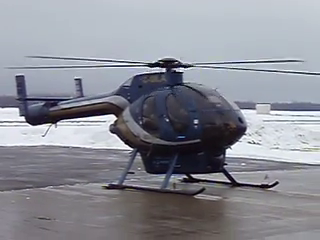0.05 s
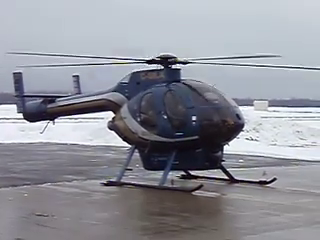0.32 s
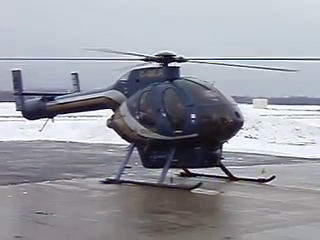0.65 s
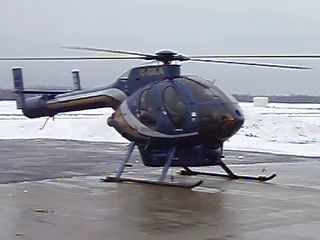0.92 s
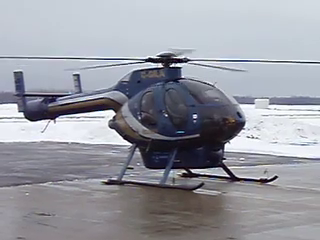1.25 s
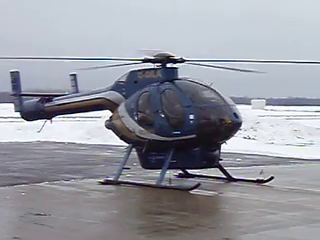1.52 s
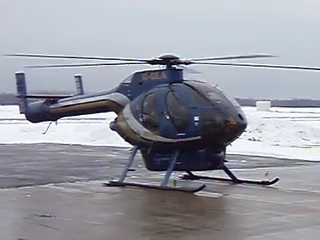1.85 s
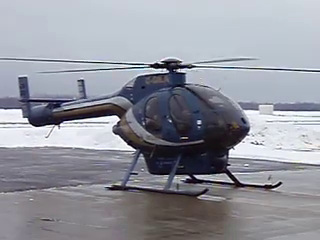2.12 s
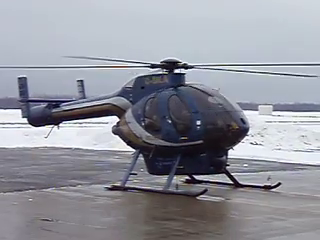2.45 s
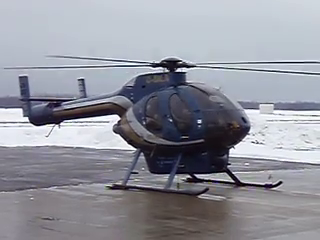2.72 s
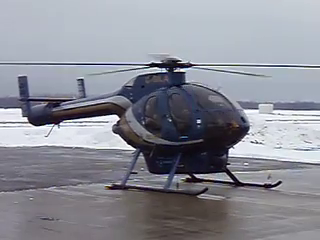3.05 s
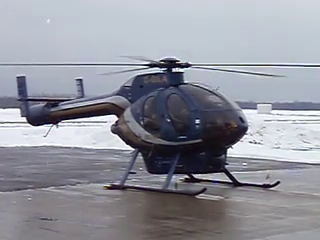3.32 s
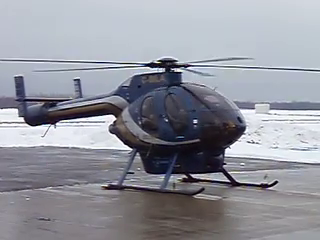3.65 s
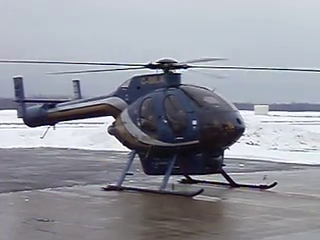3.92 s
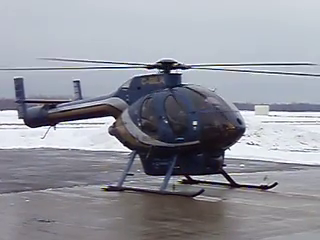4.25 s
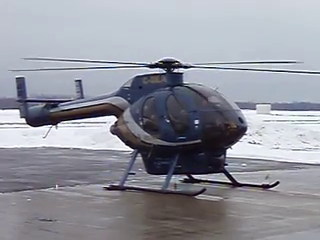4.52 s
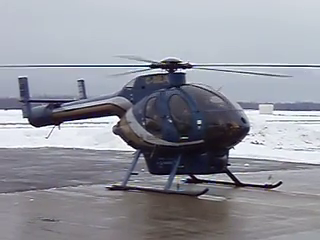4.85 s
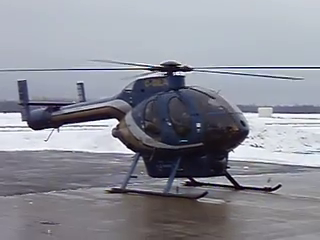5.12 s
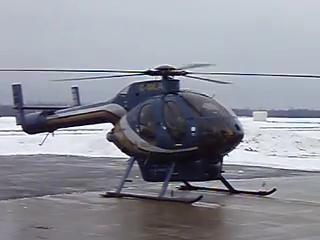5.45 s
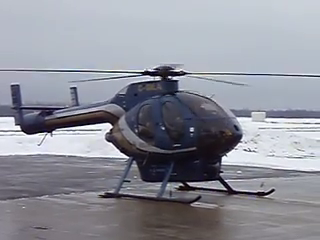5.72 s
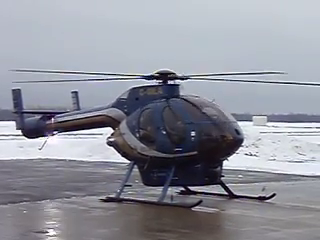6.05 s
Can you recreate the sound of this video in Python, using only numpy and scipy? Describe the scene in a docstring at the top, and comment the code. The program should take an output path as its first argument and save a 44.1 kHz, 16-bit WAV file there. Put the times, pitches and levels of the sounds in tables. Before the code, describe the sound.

A light turbine helicopter idles on an open apron, about twenty metres away, loud and continuous for the whole six seconds. A broad exhaust roar carries a hollow, low-mid drone that flares in short, irregular throbs. Beneath it the rotor churns the air with a low, shallow flutter of roughly twenty-two beats a second. On top are a bright compressor hiss and thin, high turbine and gear whines, wavering slightly but holding their pitch, with fainter tail fan tones in the middle. The roar swells a little around 3.1 seconds, and roar and hiss lift together near 4.5 seconds and again at the end. Soft, dull microphone thumps sit low in the noise at about 1.3, 3.3 and 5.3 seconds. The sound is narrow, with the highest treble missing, and runs close to overload, without any echo.

```python
"""Light turbine helicopter at idle

Five blades, open apron, some twenty metres away. The exhaust roars and drones, the blades chop
the air, the compressor hisses; turbine, gears and tail fan whine through it. The recorder has a
narrow band, runs close to overload and adds a soft low thump every two seconds."""
import sys
import numpy as np
from scipy import signal
from scipy.fft import rfft, irfft, next_fast_len
from scipy.io import wavfile

SR = 44100
rng = np.random.default_rng(int(sys.argv[2]) if len(sys.argv) > 2 else 0)


def file_out(sig):
    """Save sig as 16-bit WAV at sys.argv[1]."""
    # one column per channel
    cols = np.atleast_2d(sig).T
    # limit, then scale
    lim = np.clip(cols, -1, 1)
    pcm = np.round(lim * 32767).astype(np.int16)
    wavfile.write(sys.argv[1], SR, pcm)


N = 272538

BLADE_PASS_HZ, BLADE_COUNT = 22.4, 5
DRONE_HZ, DRONE_WIDTH_HZ = 315, 42

# Low recorder thumps. Each row: centre in seconds, peak in dB.
THUMP_PEAKS = [(1.293, -25), (3.297, -23), (5.294, -23)]
# Tail fan. Each row: time in seconds, blade rate in Hz, base level in dB.
FAN_CURVE = [(0, 651, -38), (1.2, 651, -44), (1.9, 651, -39), (2.4, 651.5, -33), (3.3, 651.5, -35),
             (4.0, 651, -40), (4.9, 650.5, -41), (6.18, 650.5, -38)]
# Fan harmonics. Each row: multiple of the blade rate, offset from the base level in dB.
FAN_HARMONICS = [(1, -.5), (2, .5), (3, -1.5), (4, -.5)]
# Shafts and accessory gears. Each row: pitch in Hz, start level in dB, end level in dB.
ACCESSORY_TONES = [(101.8, -34, -35), (127.5, -35, -35), (156, -36, -36), (270.5, -36, -36),
                   (1630, -45, -45), (2582, -40, -41), (2717, -42, -42), (3336, -45, -33)]
# Main gear mesh. Each row: time in seconds, pitch in Hz, level before trim in dB.
GEAR_MESH_CURVE = [(0, 2806, -31), (.9, 2805, -32), (1.4, 2806, -29), (1.9, 2805, -29), (2.4, 2807, -36),
                   (2.9, 2808, -38), (3.3, 2808, -28), (4.4, 2806, -28), (4.9, 2804, -31), (5.4, 2807, -35),
                   (6.18, 2806, -33)]
# Lower turbine whine. Each row: time in seconds, pitch in Hz, level in dB.
TURBINE_CURVE = [(0, 3874, -29), (.9, 3878, -29), (1.4, 3879, -30), (1.9, 3884, -28.5), (2.4, 3883, -27),
                 (2.9, 3879, -27), (3.4, 3881, -30.5), (3.9, 3883, -28), (4.4, 3885, -27), (4.9, 3881, -30),
                 (6.18, 3877, -30)]
# Rotor wash, compressor hiss, exhaust roar. Each row: frequency in Hz, relative density in dB.
WASH_SHAPE = [(20, -37), (50, -26), (75, -11.5), (90, -10), (101, 5.5), (125, 3), (195, 3.5), (225, 0),
              (245, -11.5), (300, -29), (500, -48.5)]
HISS_SHAPE = [(1500, -30), (2180, -17), (2450, -4), (2800, -.2), (3200, -.7), (3550, 1), (3820, -.2),
              (3960, -3), (4100, -5), (4250, -14), (4400, -25), (4550, -35), (4900, -55)]
ROAR_SHAPE = [(120, -23.5), (240, 0), (400, 1), (455, 6), (620, 5.5), (740, 3.5), (830, 0), (960, -2.5),
              (1180, -0.5), (1400, 0.6), (1720, -3), (2100, -0.5), (2500, -2.5), (4400, -31)]
# Strongest throbs of the drone. Each row: centre in seconds, level before trim in dB.
DRONE_THROBS = [(0.129, -14), (0.236, -14), (0.555, -15.5), (0.929, -14.5), (1.284, -15.5), (1.789, -15),
                (2.102, -16.5), (2.175, -18), (2.337, -14), (2.737, -16.5), (3.32, -15.9), (4.056, -14),
                (4.311, -15), (4.692, -19), (4.839, -18), (4.908, -14.5), (5.427, -16), (5.536, -18.5)]
# Roar and hiss slowly rise and fall in the moving air.
# Each row: time in seconds, roar offset in dB, hiss offset in dB.
BREEZE_SWELL = [(0, -0.8, 0), (.6, -1.5, -0.3), (1.6, -0.5, 0), (2.5, -0.2, -1), (3.15, 1.65, -0.7),
                (3.75, -1.5, -1.7), (4.45, 1.64, 1.85), (4.8, -0.5, -1), (5.2, 0.2, 0.8), (6.18, 1, 1.94)]
# Channel response. Each row: frequency in Hz, gain in dB.
CHANNEL_RESPONSE = [(20, 0), (4450, 0), (4560, -4), (4700, -18), (5000, -60)]


def from_db(db):
    """Decibels to gain."""
    return 10 ** (np.asarray(db) / 20)


def unit_rms(x):
    """Scale to rms 1."""
    return x / np.sqrt(np.mean(x ** 2) + 1e-20)


def curves(rows):
    """Interpolate each column over time, one value per sample."""
    times_s, *columns = np.transpose(rows)
    return [np.interp(np.arange(N) / SR, times_s, column) for column in columns]


def drift(rate_hz):
    """Low-passed random wander, rms 1."""
    size = next_fast_len(N, real=True)
    hz = np.fft.rfftfreq(size, 1 / SR)
    spectrum = rfft(rng.standard_normal(size)) / (1 + (hz / rate_hz) ** 2) ** 2
    return unit_rms(irfft(spectrum, size)[:N])


def shaped(x, response):
    """Filter by the listed gains; nothing passes above the last point."""
    hz, db = np.transpose(response)
    size = next_fast_len(N, real=True)
    bins_hz = np.maximum(np.fft.rfftfreq(size, 1 / SR), 1)
    gain_db = np.interp(np.log(bins_hz), np.log(hz), db, right=-np.inf)
    return irfft(rfft(x, size) * from_db(gain_db), size)[..., :N]


def coloured(x, shape):
    """Filter, then scale to rms 1."""
    return unit_rms(shaped(x, shape))


def phase_rad(hz):
    """Running phase from a random start."""
    return 2 * np.pi * (np.cumsum(hz * np.ones(N)) / SR + rng.random())


def breeze_db(spread_db):
    """Moving air slowly lifts and drops a level."""
    return spread_db * drift(rate_hz=1.4)


def whine(hz, level_db, waver_hz, flutter_db):
    """A tone wavers and flutters on its way through the downwash."""
    tone = np.sin(phase_rad(hz + waver_hz * drift(rate_hz=11.55)))
    flutter = from_db(flutter_db * drift(rate_hz=23))
    return from_db(level_db) * unit_rms(tone * flutter)


def thumps(half_width_s, pitch_hz):
    """Dull recorder bumps, about one cycle long."""
    out = np.zeros(N)
    for centre_s, peak_db in THUMP_PEAKS:
        offset_s = np.arange(N) / SR - centre_s
        envelope = from_db(peak_db) * np.exp(-(offset_s / half_width_s) ** 2)
        out += envelope * np.cos(2 * np.pi * pitch_hz * offset_s)
    return out


def tail_fan():
    """The tail-boom fan sings at harmonics of its blade rate."""
    hz, base_db = curves(FAN_CURVE)
    return sum(whine(k * hz, base_db + db, waver_hz=1.05 * k, flutter_db=4.0) for k, db in FAN_HARMONICS)


def drive_train(mesh_trim_db):
    """Main gear mesh plus fainter shaft and accessory tones."""
    mesh_hz, mesh_db = curves(GEAR_MESH_CURVE)
    out = whine(mesh_hz, mesh_db + mesh_trim_db, waver_hz=1.78, flutter_db=2.5)
    for hz, start_db, end_db in ACCESSORY_TONES:
        out += whine(hz, np.linspace(start_db, end_db, N), waver_hz=1.82, flutter_db=2.5)
    return out


def turbine(upper_ratio, upper_offset_db):
    """Two whines geared to one spool."""
    hz, level_db = curves(TURBINE_CURVE)
    lower = whine(hz, level_db, waver_hz=4.094, flutter_db=2.5)
    upper = whine(hz * upper_ratio, level_db + upper_offset_db, waver_hz=3.87, flutter_db=2.0)
    return lower + upper


def rotor_wash(blade_rad, level_db, chop_db, pulse_db):
    """Each blade swells the churned air and sends out one soft pressure pulse."""
    churn = rng.standard_normal(N) * from_db(chop_db * np.cos(blade_rad))
    passes = np.diff(np.floor(blade_rad / (2 * np.pi)), prepend=0)
    pulses = from_db(pulse_db) * coloured(passes, WASH_SHAPE)
    return from_db(level_db) * (coloured(churn, WASH_SHAPE) + pulses)


def compressor_hiss(blade_rad, level_db, chop_db, flicker_db):
    """Bright intake noise, stirred by the downwash."""
    stir_db = chop_db * np.cos(blade_rad) + flicker_db * drift(rate_hz=40)
    return from_db(level_db + stir_db) * coloured(rng.standard_normal(N), HISS_SHAPE)


def duct_resonance(x):
    """One two-pole mode of the exhaust duct, peak gain 1."""
    radius = np.exp(-np.pi * DRONE_WIDTH_HZ / SR)
    feedforward = np.array([1, 0, -1]) * (1 - radius ** 2) / 2
    feedback = [1, -2 * radius * np.cos(2 * np.pi * DRONE_HZ / SR), radius ** 2]
    return signal.lfilter(feedforward, feedback, x)


def exhaust_drone(rest_db, throb_half_width_s, throb_trim_db, loss_exponent):
    """Unsteady burning keeps the duct ringing; it flares in short throbs."""
    ringing = unit_rms(duct_resonance(duct_resonance(rng.standard_normal(N))))
    envelope = np.abs(signal.hilbert(ringing))
    loss = (1 + envelope ** 2) ** loss_exponent   # harder ringing loses more
    out = from_db(rest_db) * unit_rms(ringing / loss)
    for centre_s, level_db in DRONE_THROBS:
        detune, half_turns = rng.uniform(-1, 1, 2)
        hz = DRONE_HZ + detune * DRONE_WIDTH_HZ / 4
        offset_s = np.arange(N) / SR - centre_s
        peak = np.sqrt(2) * from_db(level_db + throb_trim_db)
        throb = peak * np.cos(2 * np.pi * hz * offset_s + np.pi * half_turns)
        crossfade = np.exp(-np.minimum((offset_s / throb_half_width_s) ** 2, 20))
        out += crossfade * (throb - out)
    return out


def exhaust_roar(blade_rad, level_db, chop_db, sway_db):
    """Jet noise, chopped by each blade, swaying once per rotor turn."""
    ripple_db = chop_db * np.cos(blade_rad) + sway_db * np.cos(blade_rad / BLADE_COUNT)
    return from_db(level_db + ripple_db) * coloured(rng.standard_normal(N), ROAR_SHAPE)


def scene():
    """The helicopter in open air, plus soft low recorder thumps every two seconds."""
    roar_swell_db, hiss_swell_db = curves(BREEZE_SWELL)
    blade_rad = phase_rad(BLADE_PASS_HZ)
    wash = rotor_wash(blade_rad, level_db=-23 + breeze_db(0.5), chop_db=-1.5, pulse_db=-17)
    roar_db = -18 + roar_swell_db + breeze_db(1.13)
    roar = exhaust_roar(blade_rad, roar_db, chop_db=0.82, sway_db=0.3)
    drone = exhaust_drone(rest_db=-21.2, throb_half_width_s=0.021, throb_trim_db=1.36,
                          loss_exponent=0.093)
    hiss_db = -18.5 + hiss_swell_db + breeze_db(1.1)
    hiss = compressor_hiss(blade_rad, hiss_db, chop_db=0.4, flicker_db=0.61)
    spool = turbine(upper_ratio=4119 / 3881, upper_offset_db=-7.5)
    tones = spool + drive_train(mesh_trim_db=-0.1) + tail_fan()
    return (thumps(half_width_s=0.012, pitch_hz=56) + tones + wash + hiss + drone + roar)[None]


def overload(x, knee, ceiling):
    """Linear up to the knee; rare higher peaks round off and tick faintly."""
    headroom = ceiling - knee
    excess = np.maximum(np.abs(x) - knee, 0)
    return np.sign(x) * (np.abs(x) - excess + headroom * np.tanh(excess / headroom))


def record(dry):
    """Narrow channel, soft clip, steep low-pass."""
    cutoff_hz = 15900
    clipped = overload(shaped(dry, CHANNEL_RESPONSE), knee=.62, ceiling=.76)
    return signal.sosfilt(signal.cheby1(12, .1, cutoff_hz, fs=SR, output="sos"), clipped)


dry = scene()
out = record(dry)
file_out(out)
```